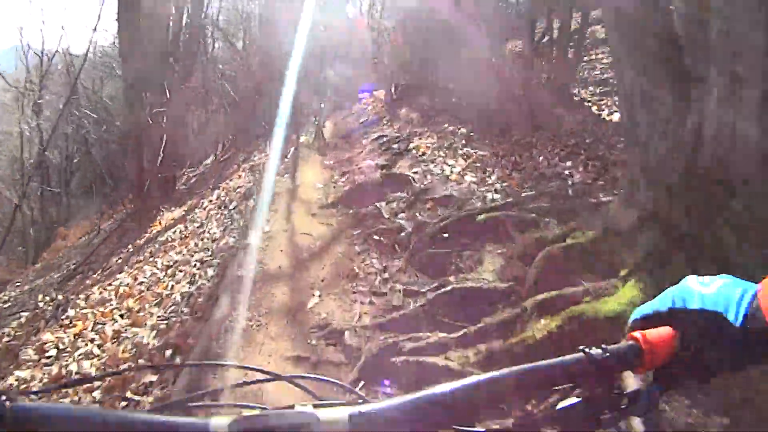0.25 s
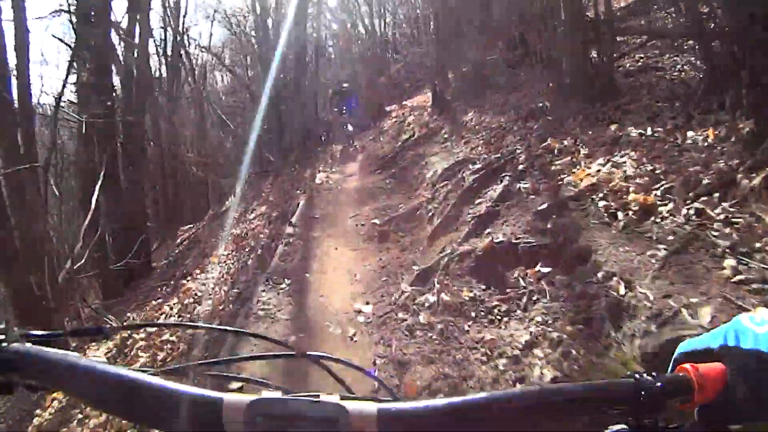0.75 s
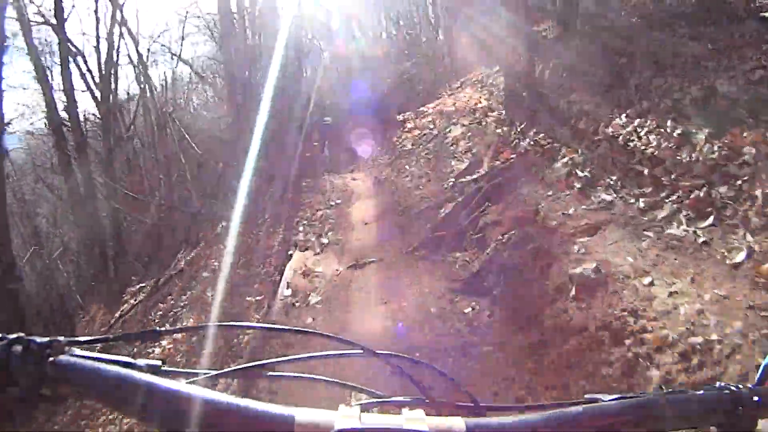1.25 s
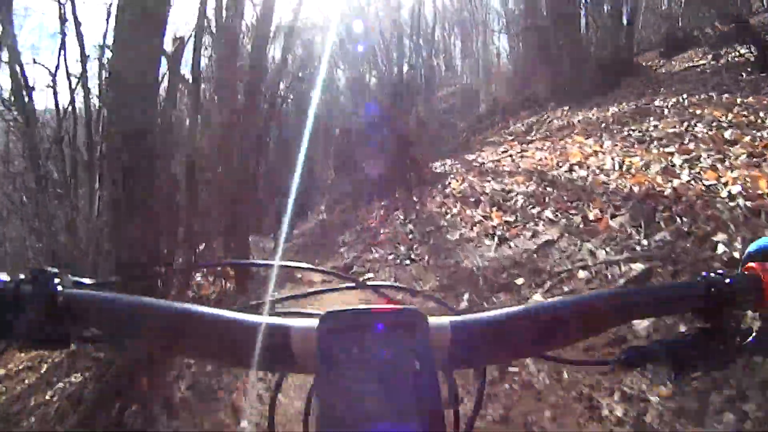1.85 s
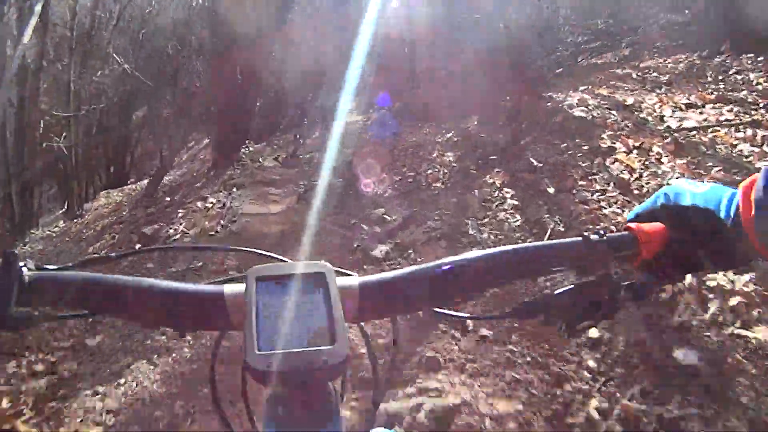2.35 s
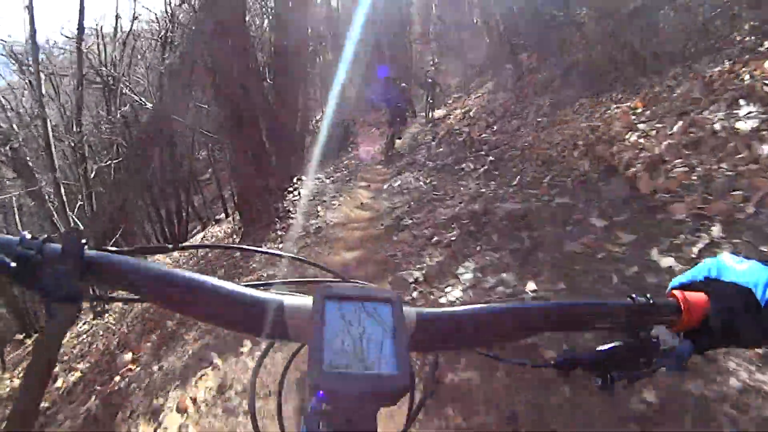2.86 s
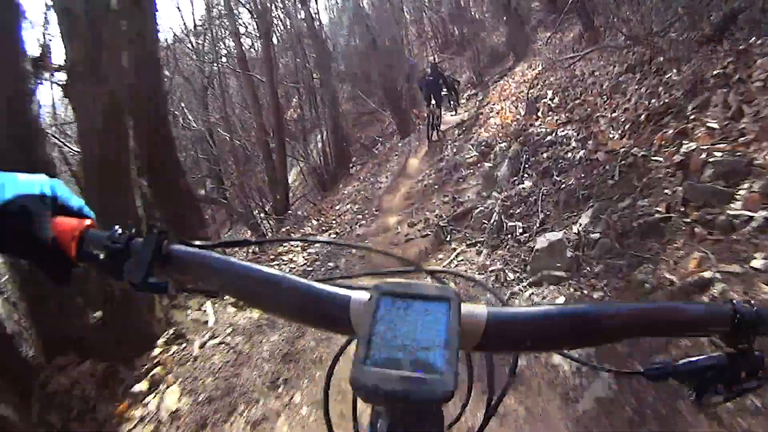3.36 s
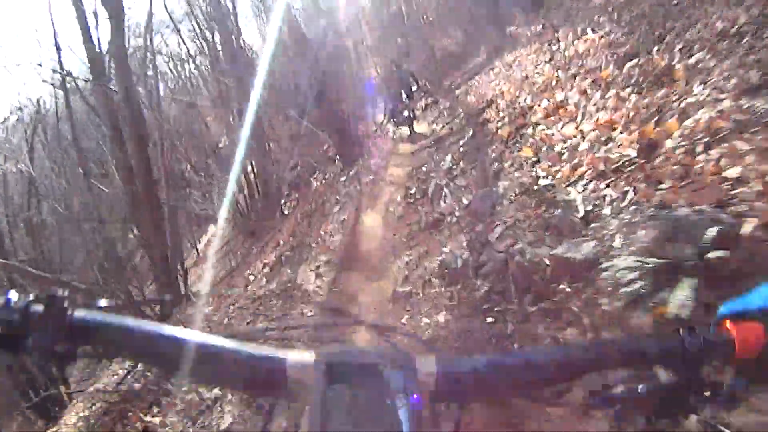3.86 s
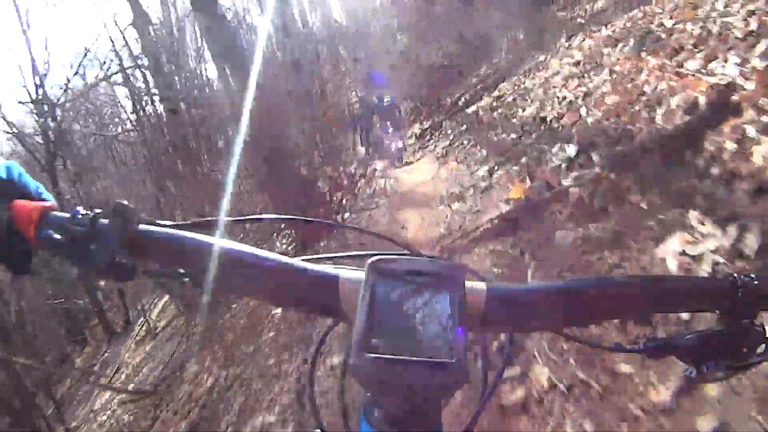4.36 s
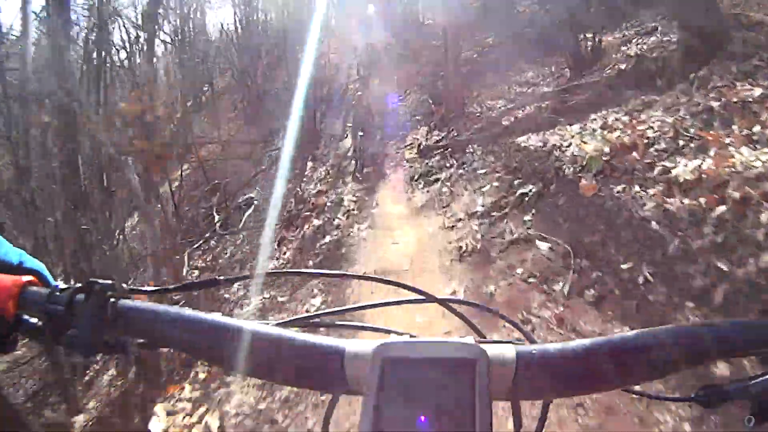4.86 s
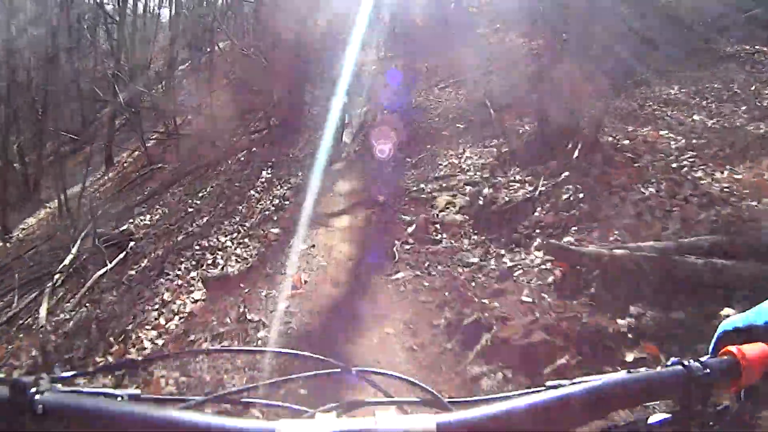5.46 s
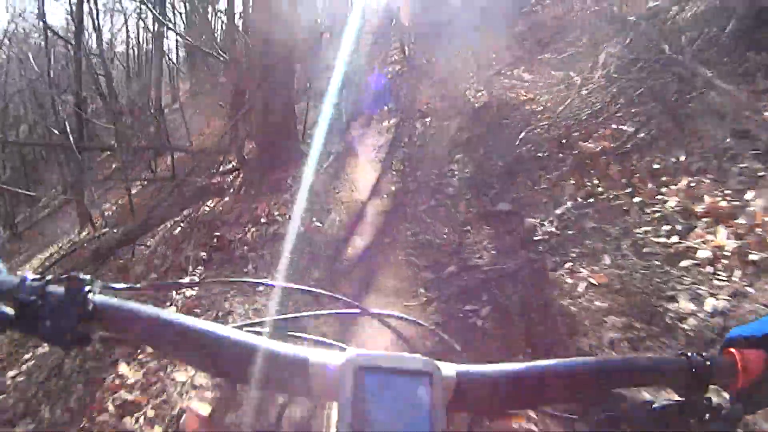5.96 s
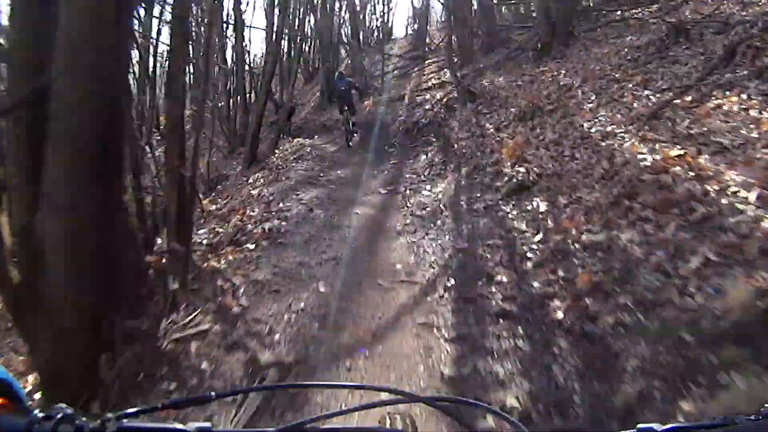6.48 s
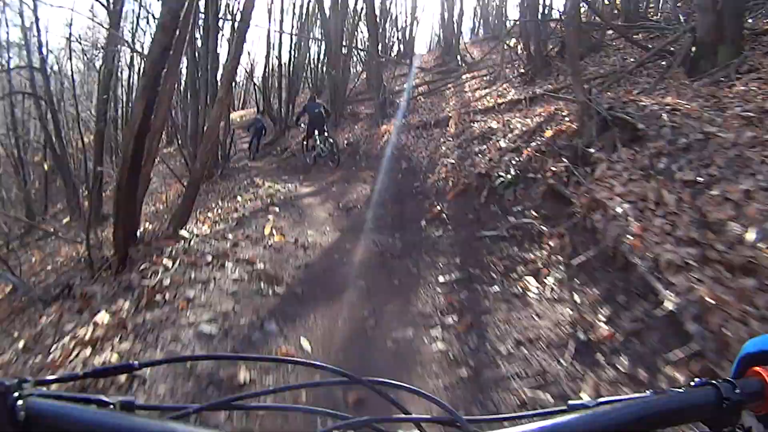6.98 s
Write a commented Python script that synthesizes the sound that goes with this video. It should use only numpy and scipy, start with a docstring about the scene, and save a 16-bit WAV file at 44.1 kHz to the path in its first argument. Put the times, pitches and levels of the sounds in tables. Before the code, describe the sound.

Deep, gusty wind rumble dominates a chest-worn stereo microphone on a mountain bike descending a dry forest trail. Leaves and twigs crunch most densely at the start, when the wind briefly drops, then crackle more softly under the tyres. Jolts bring low buffets, with frame knocks and bright ticks around the middle, followed by light chain taps. A short sheltered gap precedes renewed gusts and more rattling at the end.

```python
"""Gusty wind rumbles at two microphone ports over the crackle of leaves: a mountain bike rolls down a
dry forest trail, heard from a camera on the rider's chest. Shaped noise makes wind, tyres, crunches and
a brake hiss; short pushes and cusps make the jolts; brief sines and noise bursts make the pings, clacks,
frame knocks, ticks and taps. The wind drops in brief lulls and the camera limits the strongest gusts."""
import sys
import numpy as np
from scipy import signal
from scipy.fft import rfft, irfft
from scipy.io import wavfile
from scipy.ndimage import uniform_filter1d, minimum_filter1d, map_coordinates

SR = 44100
rng = np.random.default_rng(int(sys.argv[2]) if len(sys.argv) > 2 else 0)


def dump_mix(stems):
    """Bounce the given channels to the path in sys.argv[1] as a 16-bit WAV at rate SR."""
    frames = np.atleast_2d(stems).T  # one column per channel
    limited = np.clip(frames, -1, 1)  # hard clip at full scale
    pcm = np.round(limited * 32767).astype(np.int16)
    wavfile.write(sys.argv[1], SR, pcm)


N = 318402
TIME = np.arange(N) / SR  # seconds

# Levels in these tables are relative: most sounds add a common trim of their own.
# airflow over the camera: (time [s], rumble level [dB])
AIRFLOW = [(0, -19), (.22, -23), (.33, -29.5), (.46, -15.5), (1.05, -18), (1.3, -19), (2.1, -19),
           (3.1, -17.5), (3.6, -17.5), (4.1, -18.5), (4.5, -17), (5.1, -16.5), (5.35, -20), (5.45, -22),
           (5.59, -35), (5.68, -22.5), (5.79, -15), (6.05, -21.5), (6.4, -17.5), (7.22, -17.5)]
# brief lulls in the wind; a negative depth is a small lift: (middle [s], length [s], depth [dB])
WIND_LULLS = [(0.058, 0.066, 10), (0.145, 0.047, 8.5), (.749, 0.043, 11), (0.853, 0.016, 7),
              (1.085, 0.029, 4), (1.243, 0.035, 11), (1.375, 0.032, 12), (1.583, 0.025, 13),
              (1.703, 0.046, 10), (1.845, 0.012, 9), (2.08, 0.031, -0.5), (2.208, 0.014, 9),
              (2.486, 0.049, 9), (2.654, 0.084, 9), (2.804, 0.05, 7.5), (3.079, 0.018, 6),
              (3.203, 0.038, 7), (3.334, 0.085, 12), (3.53, 0.034, 9), (3.8, 0.055, 7), (3.856, 0.019, 19),
              (3.96, 0.11, 8), (4.048, 0.013, 1), (4.124, 0.012, 18), (4.267, 0.13, 9), (4.36, 0.024, 7),
              (4.8, 0.057, 10), (4.915, 0.075, 15.5), (4.968, 0.011, 5.5), (5.04, 0.025, 13),
              (5.412, 0.05, 8), (5.653, 0.027, 11), (5.732, 0.028, 17), (5.745, 0.022, 2),
              (5.866, 0.038, 10), (5.94, 0.016, 17), (6.174, 0.036, 18), (6.212, 0.03, 15),
              (6.365, 0.01, 4), (6.475, 0.098, 2), (6.587, 0.21, 6), (6.801, 0.045, 12), (6.899, 0.057, 14),
              (6.989, 0.011, -3), (7.06, 0.12, 6.5), (7.201, 0.016, 5)]
# colour of the wind at the two ports:
# (frequency [Hz], left level [dB], right level [dB], left lead [rad], likeness of the ports [0-1])
WIND_COLOUR = [(12, -24, -20, .2, .75), (25, -17, -15, .5, .93), (45, -10.5, -10.5, .7, .97),
               (70, -3.5, -4.5, .8, .99), (125, 0, -3, 1.0, .99), (160, -2.5, -5.5, 1.2, .985),
               (200, -9.5, -11.5, 1.4, .96), (260, -17.5, -18.5, 2.1, .9), (350, -23.5, -21.5, 2.8, .92),
               (550, -30.5, -30.5, 3.0, .85), (900, -48, -48, 3.1, .7), (3000, -80, -80, 3.1, .3)]
# how hard the tyres work the ground: (time [s], leaf crackle level [dB], hollow tread roll level [dB])
GROUND = [(0, -39.5, -48.5), (.14, -38.5, -44), (.33, -33.5, -38.5), (.47, -35, -39), (.64, -38.5, -44.5),
          (1.42, -47, -51), (1.86, -40, -46.5), (2.02, -44, -50.5), (2.3, -43, -52.5), (2.56, -38.5, -44.5),
          (2.95, -43.5, -51.5), (3.38, -39, -48.5), (3.58, -40, -46), (4.1, -38.5, -45.5),
          (4.8, -43, -49.5), (5.08, -42, -50.5), (5.25, -42.5, -49.5), (5.58, -42, -49), (5.78, -40.5, -46),
          (6.04, -39.5, -47), (6.5, -42.5, -45.5), (6.88, -44, -48.5), (7.22, -40, -42.5)]
# colour of the ground sounds at the two ports:
# (frequency [Hz], left level [dB], right level [dB], left lead [rad], likeness of the ports [0-1])
GROUND_COLOUR = [(150, -14, -14, .5, .5), (600, -8.5, -9.5, 2., .3), (1020, -8.5, -11, 2., .18),
                 (1260, 2, -6, .8, .4), (1550, -1, -8.5, 1.7, .6), (1780, -8.5, -12.5, 3.3, .57),
                 (2250, -5.5, -9.5, 2.1, .2), (3150, -12.5, -10.5, 2.6, .35), (3650, -5, -2.5, 1.8, .8),
                 (4250, -9.5, -9.5, .6, .77), (5200, -9.5, -10.5, .2, .8), (5900, -14.5, -16.5, .2, .76),
                 (7000, -13.5, -15.5, .5, .55), (10800, -24.5, -26.5, -.3, .48)]
# twigs and leaf clumps breaking: (time [s], peak level [dB], decay [ms], hollow body level [dB])
CRUNCHES = [(0.184, -22, 5.3, -3), (.212, -27, 4, -17), (0.249, -28, 4.1, -6), (0.284, -19, 6.7, 0),
            (.312, -28, 7.1, 3), (.356, -20, 5, -11), (.383, -20, 6.7, -4), (.417, -26, 9, -9),
            (0.4436, -19.5, 7.2, 1), (.463, -25, 3.9, -13), (.482, -29, 4, -8), (.502, -22, 10, 0.5),
            (0.532, -22.5, 7.3, -1), (0.573, -25.5, 5.7, -5), (.594, -22.5, 4, 1), (0.611, -23.5, 7, -22),
            (.647, -22.5, 3.3, -13), (0.681, -19, 5.6, -13), (.711, -26, 5, -8), (.766, -27, 5.7, 1),
            (.803, -23, 4.5, -4), (.907, -26.5, 7.2, -1), (.988, -26, 6.5, -9), (1.29, -33.5, 10, 0),
            (1.492, -28, 6.9, -19), (1.624, -24, 6.6, -3), (1.8182, -24.5, 21, -4), (2.1, -31, 20, -7),
            (2.221, -30, 21, -5), (2.35, -27.5, 4.5, -10), (2.439, -31, 9.2, -10), (2.707, -29, 5, -3),
            (3.275, -23.5, 6, -13), (3.313, -22.5, 4, -10), (3.35, -25.5, 6.7, -7),
            (3.381, -24.5, 4.4, 1.5), (3.429, -24, 10, -8), (3.779, -34, 3.4, 7), (3.838, -29, 15, -1),
            (3.91, -20, 4.1, 1.5), (4.002, -26.5, 5.6, -12), (4.094, -24, 4.5, -6), (4.209, -29, 3.3, -3),
            (4.318, -21, 4, -14), (4.401, -23.5, 6.9, -10), (4.49, -32, 15, -16), (4.618, -31.5, 42, -3),
            (5.407, -26.5, 4, -2), (5.431, -25, 7, -7), (5.8624, -26, 16, -2), (5.926, -25, 2.8, -6),
            (5.954, -30, 5.9, -12), (5.989, -22.5, 6, -8), (6.025, -24, 3.5, -12), (6.057, -24, 4, -13),
            (6.098, -26, 14, 0), (6.121, -27.5, 6.9, 2.5), (6.17, -23, 3.8, -8), (7.08, -32, 31, -21),
            (7.187, -29, 5.6, -3)]
# sudden buffets as the rider is jolted: (time [s], push peak level [dB], thud peak level [dB])
BUFFETS = [(0.371, -6.5, -12), (.493, -18, -40), (1.014, -8.5, -20), (1.172, -12, -32), (1.414, -8.5, -20),
           (1.532, -4, -20), (1.654, -15, -34), (1.734, -14, -27), (1.871, -7, -17), (2.158, -17, -21),
           (2.578, -11, -22), (2.728, -11.5, -15.5), (2.859, -10, -28), (3.004, -9, -26), (3.092, -11, -26),
           (3.371, -8, -29), (3.475, 12.5, -28), (4.007, 2, -47), (4.173, 2.5, -26), (4.319, -7, -20),
           (4.42, -12, -16), (4.827, -8, -37), (4.946, -4, -30), (5.069, -13, -22), (5.629, -9, -20),
           (5.769, -11, -19), (5.896, -6, -10.5), (6.032, -2, -27), (6.232, -11.5, -28), (6.255, -4, -16.5),
           (6.555, -8, -18), (6.708, -3, -25), (6.838, -2.5, -27), (6.939, -13, -23), (7.139, -8.5, -20)]
# knocks on the frame: (time [s], level of the first 4 ms [dB], centre [Hz],
# selectivity [per octave squared], contact length [ms], crack level over ring [dB])
FRAME_KNOCKS = [(.375, -48, 750, 2, 2, 0), (0.449, -27, 1300, 4.7, 3.8, -5), (1.46, -36, 1330, 16, 2, -8),
                (2.033, -37, 2100, 0.66, 2, -13), (2.5798, -22, 1230, 2.3, 3.2, 0.5),
                (2.638, -29, 2660, 2.3, 0.9, 7), (2.7078, -33, 1150, 7.2, 1.7, -1),
                (3.438, -33, 1650, 2.7, 2.5, 0), (3.4532, -19, 1900, 1.1, 1.9, -2),
                (3.875, -30, 1800, 0.42, 1.7, -3), (3.911, -37.5, 1500, 4.4, 2, -4),
                (3.994, -36, 796, 2.7, 2.5, 2), (4.098, -36, 1000, 1.8, 3, 5), (4.32, -42, 850, 1.4, 2, -2),
                (4.367, -40, 1150, 7, 2.2, -3), (5.905, -37.5, 780, 2.5, 5.8, 8),
                (5.932, -35, 1000, 1, 2.5, 15), (7.102, -33, 1760, 1.8, 2, 6),
                (7.175, -34, 1330, 5, 3.3, -2), (7.1801, -25, 2350, 16, 1.8, -6)]
# what the frame rings with: (frequency [Hz], level [dB], time to fade by 60 dB [s])
FRAME_MODES = [(595, -1, .011), (790, -3, 0.011), (1040, 12.5, 0.014), (1265, 11, 0.014), (1543, 6, 0.041),
               (1770, -6, .0099), (2180, 12.5, .018), (2460, 5.5, .018), (2820, -2, .016), (3700, 0, 0.018),
               (5100, -12, .01)]
# sharp ticks of chain and cables: (time [s], peak level [dB], centre [Hz])
TICKS = [(1.495, -36, 4730), (1.553, -25.5, 4370), (1.7494, -25, 6000), (1.7558, -28, 4880),
         (1.8743, -22, 4450), (1.883, -17, 5400), (1.932, -23, 4850), (1.971, -31, 4900),
         (2.5586, -25, 4560), (2.5775, -29, 4960), (2.5818, -22, 3670), (2.616, -31, 4300),
         (3.4235, -22, 4060), (3.4333, -22, 9900), (3.4338, -13.5, 6900), (3.453, -25, 6200),
         (3.454, -24, 4300), (3.469, -21, 4100), (3.826, -30, 5030), (3.909, -22, 5530),
         (4.0603, -23, 5400), (4.279, -24, 6350), (5.501, -26, 4700), (5.6356, -41, 5300),
         (6.033, -23, 4560), (7.1686, -26, 6000), (7.1797, -33, 8600), (7.181, -26, 4070)]
# the chain taps one guide again and again as the bike coasts: (time [s], ring peak level [dB])
CHAIN_TAPS = [(4.533, -39), (4.615, -40), (4.666, -44), (4.775, -37), (4.812, -34), (4.8906, -37),
              (4.933, -34), (4.980, -32), (5.028, -37), (5.061, -35)]

SOIL_DB, SOIL_GROWTH = -52, 1  # crumbling soil on average ground; its dB per dB of leaf crackle
# one light touch of the brake
BRAKE_ON_S, BRAKE_OFF_S, BRAKE_FADE_S, BRAKE_HZ, BRAKE_DB = 0.78, 1.2, 0.12, 4740, -47.5
TOP_HZ = 11150  # where the camera cuts the treble


def undb(db):
    """Turn decibels into a gain."""
    return 10 ** (np.asarray(db) / 20)


def unit(x):
    """Scale a sound to an average (rms) strength of one."""
    return x / np.sqrt(np.mean(x ** 2))


def curves(table):
    """Draw straight lines between the rows of a table, giving one curve per column."""
    times, *columns = np.transpose(table)
    return [np.interp(TIME, times, column) for column in columns]


def band(x, lo_hz, hi_hz, order=2):
    """Keep the part of a sound between two frequencies."""
    sos = signal.butter(order, [lo_hz, min(hi_hz, .45 * SR)], "band", fs=SR, output="sos")
    return signal.sosfilt(sos, x)


def below(x, hz):
    """Keep the part of a sound under a frequency, without delaying it."""
    return signal.sosfiltfilt(signal.butter(5, hz, fs=SR, output="sos"), x)


def walk(rate):
    """Wander smoothly at random with a spread of one, taking about `rate` steps a second."""
    step = max(int(SR / rate), 1)
    held = rng.standard_normal(N)[np.arange(N) // step]
    return unit(uniform_filter1d(held, step))


def burst(t, decay_s, rise_s=0.00042):
    """Swell quickly and die away, with a peak of one."""
    shape = (1 - np.exp(-t / rise_s)) * np.exp(-t / decay_s)
    return shape / shape.max()


def add(out, s, sound):
    """Mix a short sound in at time s."""
    start = max(int(s * SR), 0)
    out[..., start:start + sound.shape[-1]] += sound[..., :N - start]


def ports(shared, own, table):
    """Colour each microphone port; the right gets a phase-shifted, partly unrelated copy."""
    table_hz, *columns = np.transpose(table)
    hz = np.arange(N // 2 + 1) * SR / N + 1
    left_db, right_db, lead, likeness = (np.interp(np.log(hz), np.log(table_hz), c) for c in columns)
    likeness = np.clip(likeness, 0, 1)
    left, unrelated = rfft(shared), rfft(own)
    right = likeness * left * np.exp(-1j * lead) + np.sqrt(1 - likeness ** 2) * unrelated
    return irfft(np.array([left * undb(left_db), right * undb(right_db)]), N)


def mid_level(pair, lo_hz, hi_hz):
    """Scale a stereo pair so that its centre has a strength of one within a band."""
    return pair / np.std(band(pair.mean(0), lo_hz, hi_hz, order=4))


def airflow_db(ragged_db=1.24):
    """Strength of the wind: it follows the ride, wavers, and changes briefly at each lull."""
    steady_db, = curves(AIRFLOW)
    shelter_db = sum(depth * np.exp(-(2 * (TIME - s) / length) ** 2) for s, length, depth in WIND_LULLS)
    return steady_db - shelter_db + ragged_db * walk(28)


def wind(steadiness=0.6, rumble_db=1, flutter_db=-1.5, flutter_growth=0.94,
         split_hz=170, lift_db=-2.0, lift_growth=0.029):
    """Eddies roll over the ports, smaller in faster air; strong ones break up into a rougher flutter."""
    air_db = airflow_db()
    air = ports(*rng.standard_normal((2, N)), WIND_COLOUR)
    # faster air brings up the sound above the deep part
    deep = below(air, split_hz)
    air = deep + (air - deep) * undb(lift_db + lift_growth * (air_db - air_db.mean()))
    air = air / np.std(air.mean(0))
    # the airflow sets the strength; single eddies vary around it
    eddies = np.sqrt(uniform_filter1d(air.mean(0) ** 2, int(0.0442 * SR)) + 0.024)
    air = air / eddies ** steadiness * undb(air_db)
    rumble = below(air, 420)
    force = unit(np.abs(signal.hilbert(rumble[0])) ** flutter_growth)
    flutter = force * (air - rumble)
    return undb(rumble_db) * rumble + undb(flutter_db) * flutter


def grains(rate, spread_db):
    """Tiny fractures at random moments, most weak and a few strong."""
    size = undb(spread_db * np.minimum(rng.exponential(size=(2, N)), 4.5))
    breaks = rng.random((2, N)) < rate / SR
    return unit(breaks * size * rng.standard_normal((2, N)))


def clumps(rate, decay_s, spread_db):
    """Leaves give way in bunches: each starts at once and dies away."""
    size = undb(spread_db * np.minimum(rng.exponential(size=N), 3))
    starts = (rng.random(N) < rate / SR) * size
    fade = np.exp(-np.arange(4000) / SR / decay_s)
    return unit(signal.fftconvolve(starts, fade)[:N])


def waver(x, share, rate):
    """Let the pitch of a whole sound wander up and down at random by a small share."""
    place = np.arange(N) + np.cumsum(share * walk(rate))
    return np.array([map_coordinates(side, [place], order=3, mode="mirror") for side in x])


def tyres(leaf_db=-2.5, tread_db=0, clump_db=1.0, bunch_db=-8.0, rustle_db=-6,
          flicker_db=1.0, tread_flicker_db=1.55):
    """Leaves crack in clumps under the tyres, soil crumbles lower down and the knobs roll hollowly."""
    leaves_db, roll_db = curves(GROUND)
    crumble_db = SOIL_DB + SOIL_GROWTH * (leaves_db - leaves_db.mean())
    bunches = clumps(rate=90, decay_s=0.011, spread_db=-4.5)
    load = unit(undb(clump_db * walk(30)) * (1 + undb(bunch_db) * bunches))
    rustle = undb(rustle_db) * rng.standard_normal((2, N))
    crush = (grains(rate=5000, spread_db=1.5) + rustle) * load
    sound = ports(*crush, GROUND_COLOUR)
    tread, low, most = (below(sound, hz) for hz in (1720, 3200, 6200))
    # clods, leaves and fine chips each flicker in their own way
    layers = (low - tread, most - low, sound - most)
    soil, leaves, chips = (part * undb(flicker_db * walk(90)) for part in layers)
    # the pitch of the tread roll wanders a little at random
    tread = waver(tread, share=.03, rate=9) * undb(tread_flicker_db * walk(55))
    leaves = waver(leaves, share=.018, rate=14)
    leaves = mid_level(leaves + chips, 3300, 11000) * undb(leaves_db + leaf_db)
    soil = mid_level(soil, 1750, 3100) * undb(crumble_db)
    tread = mid_level(tread, 1100, 1650) * undb(roll_db + tread_db)
    return leaves + soil + tread


def jingle(ping_db=-3, spread_db=3.5, decay_s=0.0027, count=640):
    """Grit and chain links ping at random, each at its own pitch, harder on rough ground."""
    out, t = np.zeros((2, N)), np.arange(700) / SR
    rough_db, _ = curves(GROUND)
    for when, size, pitch, side in rng.random((count, 4)):
        hz = 3500 * 2 ** pitch
        # smaller bits ping higher and more softly
        db = rough_db[int(when * N)] + ping_db - 4 * pitch + spread_db * min(-np.log(1 - size), 3)
        ping = undb(db) * burst(t, decay_s, rise_s=0.00046) * np.sin(2 * np.pi * hz * t)
        balance = np.array([[.5 + side], [1.5 - side]])
        add(out, when * N / SR, ping * balance)
    return out


def pebbles(clack_db=3, spread_db=2.5, decay_s=0.0016, low_hz=560, octaves=1.69, count=260):
    """Small stones shift under the tyres: dull clacks, each at its own pitch, harder on rough ground."""
    out, t = np.zeros((2, N)), np.arange(900) / SR
    _, roll_db = curves(GROUND)
    for when, size, pitch, turn in rng.random((count, 4)):
        db = roll_db[int(when * N)] + clack_db + spread_db * min(-np.log(1 - size), 3)
        hz = low_hz * 2 ** (octaves * pitch)
        phase = 2 * np.pi * (hz * t + np.array([[0], [turn]]))
        add(out, when * N / SR, undb(db) * burst(t, decay_s) * np.sin(phase))
    return out


def crunches(crunch_db=-8.5, rise_s=0.00083):
    """A twig or a whole clump collapses at once: dry splinters, with more or less hollow body."""
    force, hollow, t = np.zeros(N), np.zeros(N), np.arange(2500) / SR
    for s, db, decay_ms, body_db in CRUNCHES:
        collapse = undb(db + crunch_db) * burst(t, decay_ms / 1000, rise_s)
        add(force, s, collapse)
        add(hollow, s, collapse * undb(body_db))
    splinters = ports(*grains(rate=9000, spread_db=1.3), GROUND_COLOUR)
    splinters = mid_level(splinters, 1500, 8000)
    body = below(splinters, 1700)
    return force * (splinters - body) + hollow * body


def buffets(push_db=0, rise_s=0.0021, swing_hz=135, lag_s=0.0011, right_db=-2):
    """A jolt throws an eddy across the left port and then the right: a steep push that swings back."""
    out, t = np.zeros((2, N)), np.arange(2000) / SR
    chances = rng.standard_normal((len(BUFFETS), 3))
    for (s, db, _), (pitch, sign, delay) in zip(BUFFETS, chances):
        swing = np.sin(2 * np.pi * swing_hz * np.exp(0.27 * pitch) * t)
        push = (1 - np.exp(-t / rise_s)) * np.exp(-t / 0.0045) * swing
        push = push / np.abs(push).max() * undb(db + push_db) * np.sign(sign)
        add(out[0], s, push)
        add(out[1], s + lag_s * np.exp(0.52 * delay), push * undb(right_db))
    return out


def thuds(thud_db=-4.5, wake_db=-9, wake_s=0.0082, width_s=0.00041, lag_s=0.00064, right_db=-4,
          low_hz=180, high_hz=540):
    """The pressure of a buffet collapses in a cusp that pushes on the left port and pulls on the right."""
    out, t = np.zeros((2, N)), np.arange(2500) / SR
    lead_s, dull_hz = .002, 820
    for s, _, db in BUFFETS:
        distance = np.abs(t - lead_s - np.array([[0], [lag_s]]))
        cusp = np.exp(-distance / width_s) * np.array([[1], [-1]])
        # torn air flutters along with it, mostly opposite at the two ports
        mid, side = rng.standard_normal((2, len(t)))
        torn = unit(below(0.64 * mid + np.array([side, -side]), dull_hz))
        wake = undb(wake_db) * torn * burst(t, wake_s, rise_s=0.0029)
        thud = below(band(cusp + wake, low_hz, high_hz), dull_hz)
        thud = thud / np.abs(thud).max() * undb(db + thud_db)
        add(out, s - lead_s, thud * undb([[0], [right_db]]))
    return out


def knocks(knock_db=0, bump_db=-1, bump_s=0.0041, right_db=-1.5, spread=1.0, rise_s=0.00016,
           crack_octaves=1.1, detune=.03, rebound_s=0.0024, rebound_db=-4, ring_db=-1):
    """A stone or root hits the frame and catches again: the contact cracks and picks which modes ring."""
    out, t = np.zeros((2, N)), np.arange(3000) / SR
    for s, db, hz, focus, contact_ms, crack_db in FRAME_KNOCKS:
        mid, side = rng.standard_normal((2, len(t)))
        grit = mid + spread * np.array([side, -side])
        contact_s = contact_ms / 1000
        # each blow rings the modes slightly off pitch, at random
        shifts = 1 + detune * rng.uniform(-0.88, 1, len(FRAME_MODES))
        turns = rng.random(len(FRAME_MODES))
        ring = np.zeros((2, len(t)))
        for (mode_hz, mode_db, t60), shift, turn in zip(FRAME_MODES, shifts, turns):
            # modes far from the centre of the blow stay quiet
            response = np.exp(-focus * np.log2(mode_hz / hz) ** 2)
            cycles = mode_hz * shift * t + rng.random((2, 1)) / 4 + turn
            ring += undb(mode_db - 60 * t / t60) * response * np.sin(2 * np.pi * cycles)
        ring *= 1 - np.exp(-t / rise_s)
        # an unselective contact cracks over a wide band and gives a dull bump
        reach = 2 ** (crack_octaves / np.sqrt(max(focus, 1 / 4)))
        rebound = undb(rebound_db) * burst(np.maximum(t - rebound_s, 0), contact_s, rise_s)
        contact = burst(t, contact_s / 2, rise_s) + rebound
        crack = band(grit * contact, hz / reach, hz * reach)
        bump = undb(bump_db) / (1 + focus) * unit(band(grit * np.exp(-t / bump_s), 320, 1500))
        knock = undb(ring_db) * unit(ring) + undb(crack_db) * unit(crack) + bump
        knock = knock * undb([[0], [right_db]])
        strength = np.std(knock.mean(0)[t < .004])
        add(out, s, knock / strength * undb(db + knock_db))
    return out


def brake(half_width_hz=300):
    """Pads drag lightly on the rotor: a narrow, uneven hiss that fades in, holds and fades out."""
    squeeze = np.clip(np.minimum(TIME - BRAKE_ON_S, BRAKE_OFF_S - TIME) / BRAKE_FADE_S, 0, 1)
    hiss = below(rng.standard_normal(N), half_width_hz) * np.sin(2 * np.pi * BRAKE_HZ * TIME)
    judder_db = 5 * np.tanh(walk(45))
    return unit(hiss) * squeeze * undb(BRAKE_DB + judder_db)


def ticks(tick_db=-1, decay_s=0.0017, body_db=-12, spread=0.38, width=1.37, ping_db=-1):
    """Links and cables jingle in a brief burst and ping at their own pitch."""
    out, t = np.zeros((2, N)), np.arange(1500) / SR
    reach = max(width, 1.05)
    for s, db, hz in TICKS:
        mid, side = rng.standard_normal((2, len(t))) * burst(t, decay_s)
        contact = mid + spread * np.array([side, -side])
        snap = band(contact, hz / reach, hz * reach) + undb(body_db) * band(contact, 2500, 5900)
        ping = unit(burst(t, decay_s) * np.sin(2 * np.pi * hz * t))
        tick = unit(snap) + undb(ping_db) * ping
        add(out, s, tick / np.abs(tick.mean(0)).max() * undb(db + tick_db))
    return out


def taps(ring_hz=6480, decay_s=0.0013, click_db=-5):
    """Each tap rings the same small metal part, over a faint click."""
    out, t = np.zeros((2, N)), np.arange(1000) / SR
    for s, db in CHAIN_TAPS:
        click = undb(click_db) * unit(band(rng.standard_normal((2, len(t))), 3600, 7600))
        ring = np.sin(2 * np.pi * ring_hz * t)
        add(out, s, undb(db) * burst(t, decay_s) * (ring + click))
    return out


def limited(air, ceiling, hold_s=0.003):
    """Turn the gain down smoothly around every peak that would pass the ceiling."""
    size = max(int(hold_s * SR), 8)
    room = np.minimum(1, ceiling / (np.abs(air).max(0) + 1e-9))
    return air * uniform_filter1d(minimum_filter1d(room, size), size)


def scene(ceiling=0.47, overload=0.42, right_db=-1):
    """Wind, held down and rounded where it overloads the ports, over the sounds of the bike."""
    air = limited(wind() + buffets(), ceiling)
    limit = overload * undb([[0], [right_db]])
    air = air / (1 + (air / limit) ** 8) ** (1 / 8)
    ground = tyres() + jingle() + pebbles() + crunches()
    bike = knocks() + brake() + ticks() + taps()
    return air + thuds() + ground + bike


def record(dry):
    """The camera cuts the top steeply."""
    return signal.sosfilt(signal.ellip(12, .2, 80, TOP_HZ, fs=SR, output="sos"), dry)


dry = scene()
out = record(dry)
dump_mix(out)
```